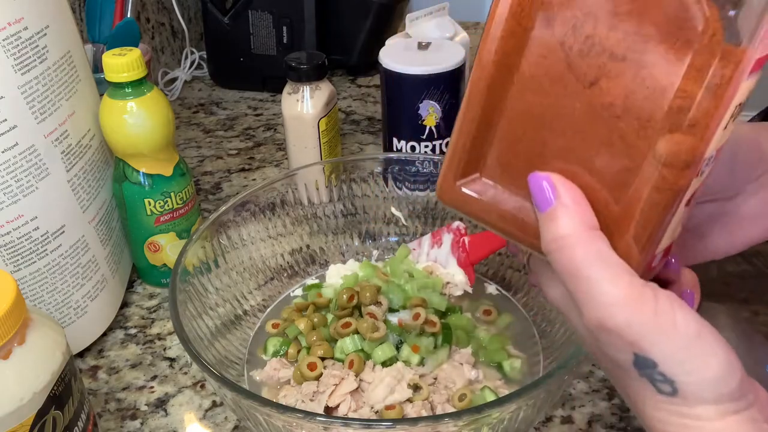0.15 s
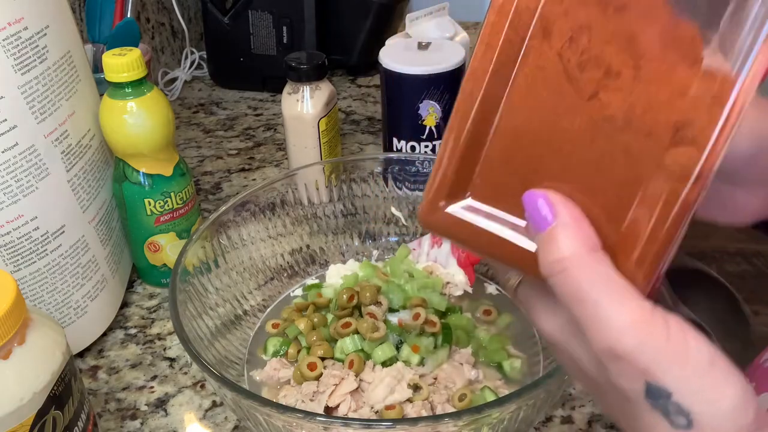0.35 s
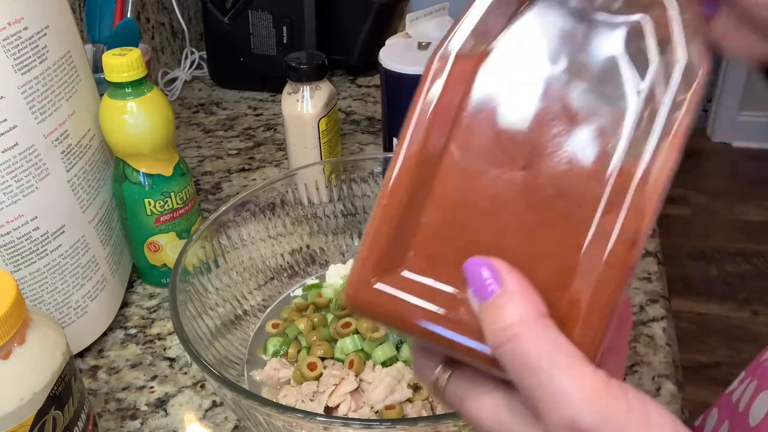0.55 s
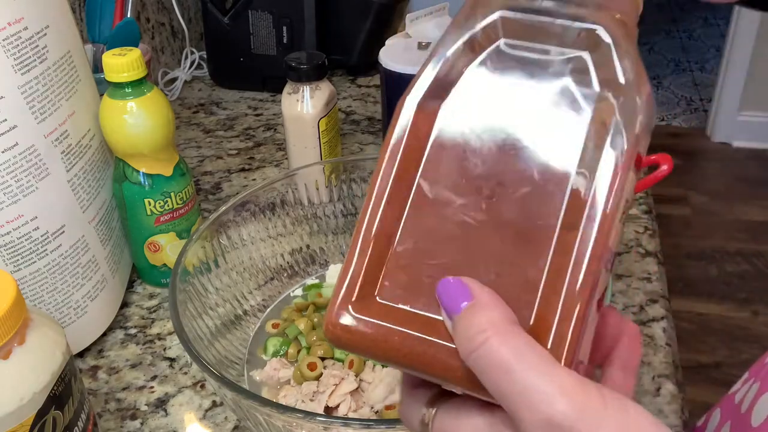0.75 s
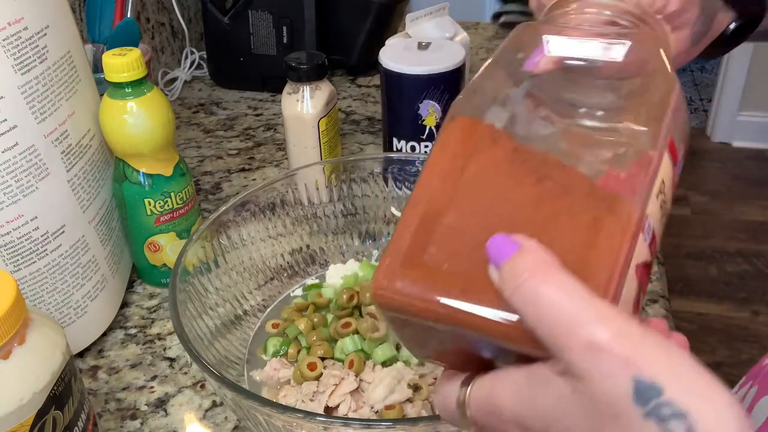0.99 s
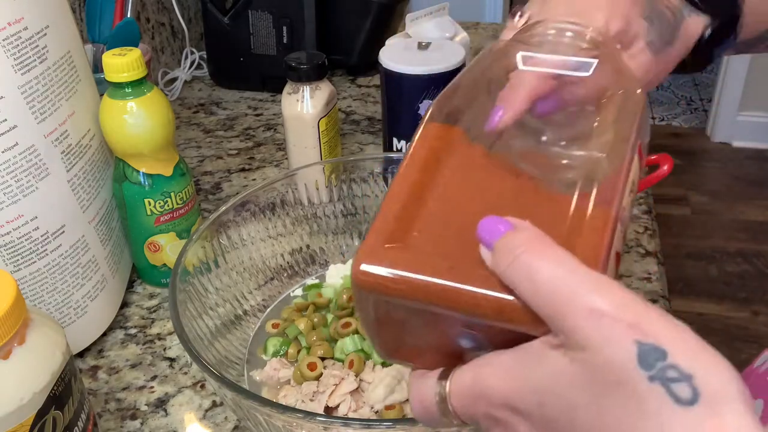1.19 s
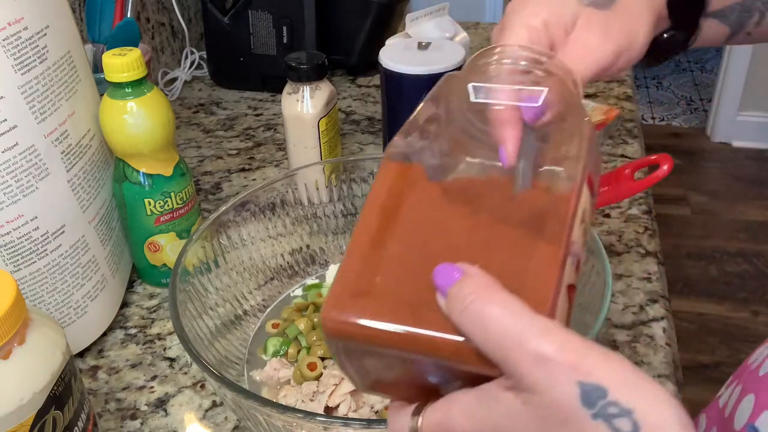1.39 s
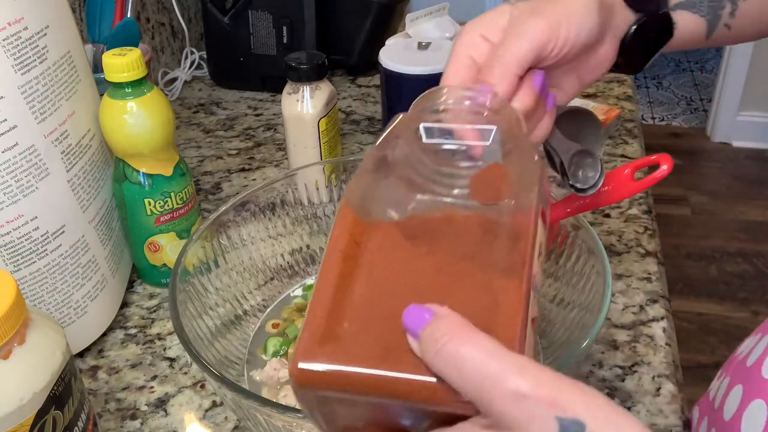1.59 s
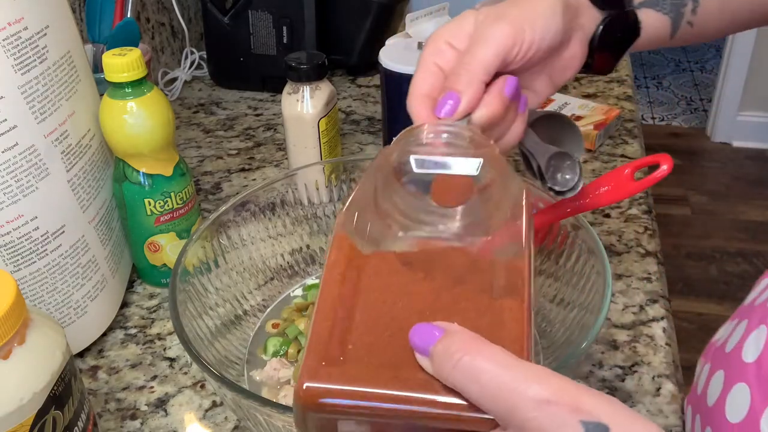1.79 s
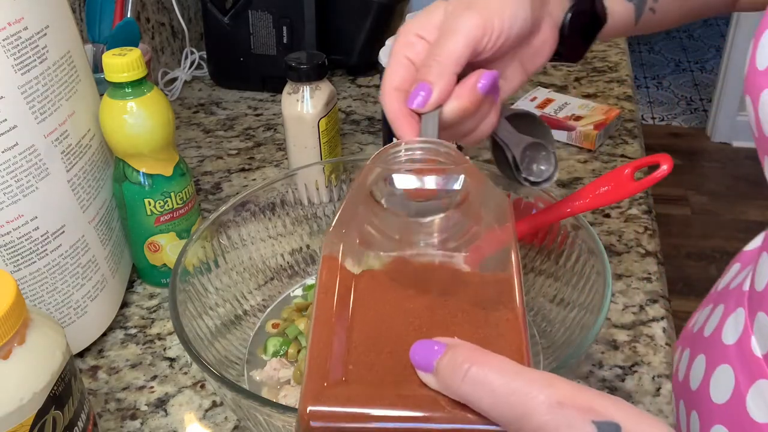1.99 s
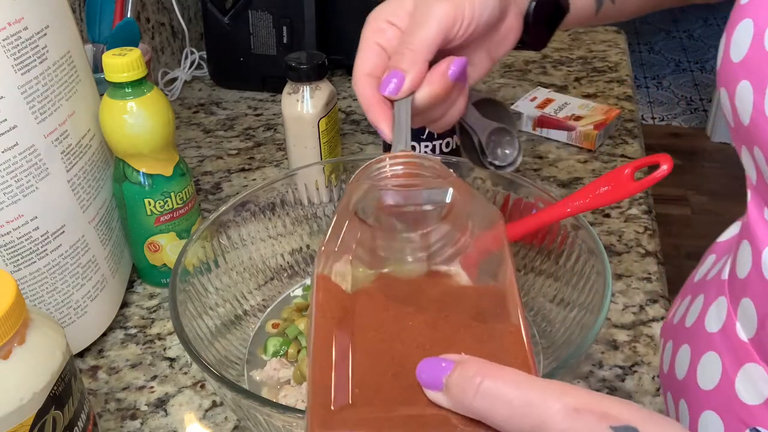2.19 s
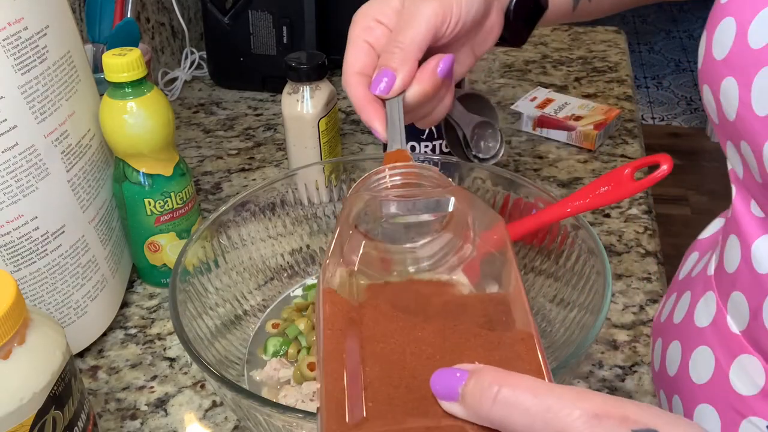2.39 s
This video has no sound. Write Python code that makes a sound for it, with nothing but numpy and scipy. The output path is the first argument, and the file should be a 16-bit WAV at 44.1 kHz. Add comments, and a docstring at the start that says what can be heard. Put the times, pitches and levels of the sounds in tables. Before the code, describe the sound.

Steel measuring spoons jangle brightly, then one scrapes softly through powder in a plastic jar.

```python
"""A bright jangle of steel measuring spoons, picked up close to a stereo microphone pair in a kitchen.
They ring as they strike and sing as they slide over each other. One knocks a hollow note from a
plastic spice jar and scrapes through the powder, which then slides off in three soft swishes.
The left microphone hears it all first; the small room answers, and an appliance hums underneath."""
import sys
import numpy as np
from scipy import signal
from scipy.fft import rfft, irfft
from scipy.io import wavfile
from scipy.ndimage import uniform_filter1d

SR = 44100
rng = np.random.default_rng(int(sys.argv[2]) if len(sys.argv) > 2 else 0)


def bounce(signal):
    """Save signal as a 16-bit WAV file at the path given by the first command-line argument."""
    frames = np.transpose(np.atleast_2d(signal))
    limited = np.clip(frames, -1, 1)
    pcm = np.round(limited * 32767).astype(np.int16)
    wavfile.write(sys.argv[1], SR, pcm)


N = 108045

# spoon on spoon, close up (t/s, level/dB, low-mode weight/dB, chatter decay/s, ring/dB,
# favoured resonance f/Hz, its boost/dB)
CLINKS = [(0.1443, -35, 15, 0.0018, -19, 3970, -10), (0.1991, -25.5, 11.5, 0.0023, -21, 8100, 0.5),
          (0.2127, -22.5, 3, 0.0028, -26, 10300, 1), (0.2155, -31, 9.5, 0.01, -25, 5000, 1),
          (0.237, -15, -10.5, 0.0035, -41, 13400, 8), (0.3172, -6, 2.5, 0.0018, -23.5, 9700, 0),
          (0.3182, -14, 16, 0.0016, -37.5, 3400, -4), (0.3209, -10, -13, .003, -19.5, 14000, 0.5),
          (0.4138, -13.5, -9.5, .0035, -31, 9950, -2), (0.4213, -15.5, -1, 0.0029, -32, 5650, 11),
          (.4622, -24, -1, 0.0016, -37, 14000, -2), (0.4671, -18, -9.5, 0.0035, -48, 14000, -8),
          (0.4816, -26, 5, .003, -41, 12100, -7), (0.4925, -15, -1.5, 0.00071, -30, 11500, 0)]
# damped mode clusters of the nested spoons (f/Hz, width/Hz, level/dB)
NESTED_MODES = [(940, 460, -28.5), (1744, 600, -26), (2450, 610, -16.5), (3440, 800, -13.5),
                (4260, 380, -14), (4930, 300, -9.5), (5500, 2100, -20.5), (6597, 580, -9),
                (8100, 300, -2.5), (8670, 210, -6), (9900, 150, -19), (10040, 510, 1.5),
                (12040, 1500, -16.5), (11850, 1300, -2.5), (13200, 900, -12), (14000, 500, -5),
                (14850, 440, -0.5), (16470, 960, -9.5)]
# long-ringing modes of the steel (f/Hz, level/dB, t60/s)
STEEL_MODES = [(3300, -11, .1), (4075, -13, .12), (4965, -15, .12), (6620, -18, .1), (8043, -4, .14),
               (8591, -9, .18), (9320, -2, .09), (9596, -1, .12), (9756, 2, .13), (11665, -8, .15),
               (12095, -1, .19), (13440, -6, .15), (13900, -4, .09), (14830, -5, .12)]
FAVOURED_WIDTH_HZ, GRIP_DETUNE = 870, .012

def spoon_clinks():
    """Steel strikes, chatters and rings; the point of contact favours one resonance."""
    out, t = np.zeros((2, N)), clock()[:SR // 3]
    lowpass = signal.butter(2, 4500, fs=SR, output="sos")
    lead = 20  # samples of room for the low band to spread ahead of the strike
    for start, db, low_db, decay, ring_db, hz, boost_db in CLINKS:
        contact = amp(-10.5) * rng.standard_normal(len(t)) * np.exp(-t / decay)  # chatter
        contact[0] += amp(1)  # strike
        contact = np.pad(contact, (lead, 0))
        contact += (amp(low_db) - 1) * signal.sosfiltfilt(lowpass, contact, padtype=None)
        contact += amp(boost_db) * resonate(contact, hz, FAVOURED_WIDTH_HZ)
        held_modes = outline(NESTED_MODES) * [1 + GRIP_DETUNE * rng.uniform(-1, 1), 1]
        add(out, amp(db) * colour(contact, held_modes), start - lead / SR)
        steel = ring(STEEL_MODES, scatter_db=2.5, low_db=low_db / 2)
        add(out, amp(db + ring_db) * steel / 2, start)
    return out


# spoon sliding on spoon (t/s, rise/s, fall/s, level/dB, singing resonance f/Hz, its boost/dB)
SLIDES = [(.114, 0.027, 0.026, -47, 11000, -5), (.205, 0.0114, .01, -31, 10300, 9),
          (.238, 0.019, 0.0066, -17.5, 9700, -6), (.283, .012, .006, -35.5, 15000, 7.5),
          (.3095, 0.0031, 0.0025, -17.5, 14800, -2.5), (.455, 0.034, .035, -52, 14000, -6),
          (.645, 0.012, .04, -56, 12100, -4)]
# resonances that the sliding rim excites (f/Hz, width/Hz, level/dB)
RIM_MODES = [(4990, 290, -8), (5800, 340, -11.5), (6650, 1200, -13), (8600, 450, -13.5), (9700, 590, -2),
             (11300, 1800, -11), (12700, 450, -10.5), (13560, 170, 4.5), (14800, 2000, -10.5)]

def spoon_slides():
    """Steel sticks and slips on steel; each slide sings at its own resonance."""
    friction, slide = crunch(per_s=1000), 0
    for start, rise, fall, db, hz, boost_db in SLIDES:
        stroke = friction * strokes([(start, rise, fall, db)])
        slide = slide + stroke + amp(boost_db) * resonate(stroke, hz, FAVOURED_WIDTH_HZ)
    slide = signal.sosfilt(signal.butter(4, 4590, "high", fs=SR, output="sos"), slide)
    steel = unit_energy(ring(STEEL_MODES, scatter_db=1.5))
    return amp(-10) * colour(slide, outline(RIM_MODES)) + amp(-23) * through(slide, steel)


# knocks on the jar (t/s, hollow note level/dB, tick level/dB)
KNOCKS = [(.1663, -39.5, -40), (0.9337, -33.5, -43), (1.0925, -46, -36.5), (1.179, -42, -54),
          (1.249, -54, -36.5), (1.256, -59.5, -44)]
# modes of the plastic jar (f/Hz, level/dB, t60/s)
JAR_MODES = [(760, -5, 0.041), (871, 3, 0.041), (1026, 2, 0.031), (1680, -11, 0.011), (1980, -6.5, 0.017),
             (2170, -6.5, .018), (3400, -12, 0.013)]
# spectrum of the contact tick (f/Hz, level/dB per Hz)
TICK_COLOUR = [(500, -13.5), (1000, -10.5), (1500, -11.5), (2200, 3), (2900, -3), (3500, 1.5), (4400, -7.5),
               (4950, -8.5), (6000, -9.5), (10000, -12.5), (12000, -9), (15500, -23.5)]
JAR_RISE_S, TICK_DECAY_S = .00063, .0047

def jar_knocks():
    """The spoon hits the plastic jar: a tick of contact and a short hollow note."""
    notes, ticks, t = np.zeros((2, N)), np.zeros((1, N)), clock()[:SR // 3]
    onset = 1 - np.exp(-t / JAR_RISE_S)
    for start, note_db, tick_db in KNOCKS:
        add(notes, amp(note_db) * ring(JAR_MODES, scatter_db=1.5) * onset / 2, start)
        tick = rng.standard_normal(len(t)) * onset * np.exp(-t / TICK_DECAY_S)
        add(ticks, amp(tick_db) * tick / 2, start)
    return notes + colour(ticks, TICK_COLOUR)


# taps of a spoon's edge (t/s, level/dB)
TAPS = [(.6347, -29.5), (.689, -48.5), (0.932, -36.5)]
# their spectrum (f/Hz, level/dB per Hz)
TAP_COLOUR = [(1800, -19.5), (3500, -9.5), (6000, -13), (9000, -3), (15000, -7)]

def edge_taps(decay_s=.0013):
    """A spoon's edge makes brief contact: dry ticks with no ring."""
    taps, t = np.zeros((1, N)), clock()[:SR // 3]
    for start, db in TAPS:
        add(taps, amp(db) * rng.standard_normal(len(t)) * np.exp(-t / decay_s) / 2, start)
    return colour(taps, TAP_COLOUR)


# glancing touches on the jar (t/s, f/Hz, width/Hz, decay/s, level/dB)
SCUFFS = [(0.1667, 900, 600, 0.005, -41.5), (0.2374, 1493, 450, 0.0056, -47.5),
          (.246, 2070, 1200, 0.026, -53), (.786, 720, 296, 0.009, -58), (1.692, 2780, 197, 0.0054, -59),
          (1.694, 3260, 161.4, 0.0064, -51), (1.944, 2800, 300, 0.0054, -52.5),
          (1.966, 3400, 397, .008, -57)]

def jar_scuffs():
    """Soft, brief scuffs each wake one resonance of the jar's wall."""
    out, t = np.zeros((1, N)), clock()[:SR // 8]
    onset = 1 - np.exp(-t / JAR_RISE_S)
    for start, hz, width, decay, db in SCUFFS:
        noise = rng.standard_normal(len(t))
        scuff = unit(resonate(resonate(noise, hz, width), hz, width))
        add(out, amp(db) * scuff * onset * np.exp(-t / decay), start)
    return out


# spoon and fingers brushing the jar, then digging in it (t/s, level/dB)
DIG_EFFORT = [(0, -67), (.05, -68.5), (.085, -73), (.8, -77.5), (.86, -73.5), (.92, -64.5), (.98, -63.5),
              (1.012, -70.5), (1.036, -59.5), (1.125, -60.5), (1.18, -57), (1.235, -72), (1.275, -57),
              (1.34, -64.5), (1.42, -64.5), (1.445, -82)]
# spectrum of the digging (f/Hz, level/dB per Hz)
DIG_COLOUR = [(240, -19), (400, -3), (635, -6), (707, -6), (837, -1), (1040, -4), (1230, -9.5),
              (1750, -10.5), (2110, -3.5), (2870, -14), (3550, -12.5), (4270, -18), (4910, -10.5),
              (5900, -20), (7000, -13.5), (8280, -14.5), (9220, -17.5), (15800, -16)]

def digging(damping_s=.008):
    """Gritty friction faintly rings the spoon; buried in powder, it rings only briefly."""
    friction = crunch(per_s=1000) * effort(DIG_EFFORT)
    steel = ring(STEEL_MODES, scatter_db=1.5, low_db=-.5)
    buried = unit_energy(steel * np.exp(-clock()[:SR // 3] / damping_s))
    return colour(friction, DIG_COLOUR) + amp(-10.5) * through(friction, buried)


# the spoon against the jar's wall (t/s, level/dB)
RUB_EFFORT = [(1.66, -90), (1.78, -66), (1.91, -77.5), (1.98, -64), (2.13, -58.5), (2.19, -63.5),
              (2.22, -62.5), (2.32, -64), (2.38, -55.5), (2.45, -57.5)]
# spectrum of the rubbing (f/Hz, level/dB per Hz)
RUB_COLOUR = [(180, -26.5), (300, -3), (541, -10.5), (700, -6), (930, 3), (1300, -6), (1700, -12),
              (2100, -5), (2650, -14), (3220, -14.5), (4470, -31), (4850, -23.5), (15000, -26)]

def wall_rub():
    """Duller friction as the spoon is drawn up the wall."""
    return colour(grains(spread_db=7.5) * effort(RUB_EFFORT), RUB_COLOUR)


# powder sliding (t/s, rise/s, fall/s, level/dB)
SWISHES = [(1.64, 0.083, 0.089, -59), (1.925, 0.033, 0.08, -58), (2.22, 0.043, 0.064, -55.5)]
# its spectrum (f/Hz, level/dB per Hz)
POWDER_COLOUR = [(880, -42.5), (1500, -6.5), (1860, -13.5), (2330, -2), (3690, -1), (6010, -4.5),
                 (7980, -5), (12600, -15), (13700, -21), (15500, -28)]

def powder_swishes():
    """Fine powder slides off the spoon, a soft hiss spread wide across the microphones."""
    hiss = np.array([grains(spread_db=6.5) for _ in range(2)])
    return colour(hiss * strokes(SWISHES), POWDER_COLOUR)


# bites of the rim (t/s, rise/s, fall/s, level/dB)
BITES = [(1.68, .012, 0.013, -56), (1.938, .02, 0.018, -60), (2.254, 0.0092, .028, -53.5)]
# spectrum of the grit (f/Hz, level/dB per Hz)
GRIT_COLOUR = [(2300, -15), (2750, -6), (3000, -20.5), (3300, -3), (4400, -1), (4950, 0), (5600, -2),
               (8000, 0), (12000, -20)]

def grit_bites():
    """Granules crack as the spoon's rim bites into them."""
    return colour(crunch(per_s=350) * strokes(BITES), GRIT_COLOUR)


# shifts of the hand (t/s, rise/s, fall/s, level/dB)
GRIPS = [(.36, 0.081, 0.062, -60.5), (.785, 0.0013, 0.02, -63.5), (.935, 0.011, 0.011, -57),
         (1.82, 0.015, 0.03, -54.5)]
# their spectrum (f/Hz, level/dB per Hz)
GRIP_COLOUR = [(200, -11), (350, -1), (560, -5), (800, -8), (1600, -23), (4000, -22)]

def hand_on_jar():
    """The hand shifts on the jar with a low, muffled rub."""
    return colour(rng.standard_normal(N) * strokes(GRIPS), GRIP_COLOUR)


NEAR_DECAY_S, EARLY_DECAY_S, ROOM_T60_S, RIGHT_MIC_LAG_S = .0018, .01, .52, .00057

def kitchen(x):
    """Hands, jar and cupboards scatter the sound on its way to the microphones; a short tail follows."""
    t = clock()[:SR // 2]
    shape = (2, len(t))
    near = rng.standard_normal(shape) * np.exp(-t / NEAR_DECAY_S)
    echoes = rng.standard_normal(shape) * (rng.random(shape) < .05)
    early = echoes * np.exp(-t / EARLY_DECAY_S) * (t > .002)
    tail = rng.standard_normal(shape) * amp(-60 * t / ROOM_T60_S) * (t > .008)
    near, early, tail = (unit(path) / np.sqrt(len(t)) for path in (near, early, tail))
    near = signal.sosfilt(signal.butter(1, 2450, "high", fs=SR, output="sos"), near)
    tail = signal.sosfilt(signal.butter(1, 11000, fs=SR, output="sos"), tail)
    paths = rfft((t == 0) + amp(.5) * near + amp(-4.5) * early + amp(-8.5) * tail)
    # even out the broad peaks, so the room adds little colour
    power = uniform_filter1d(np.abs(paths) ** 2, size=150, axis=1)
    flatten = minimum_phase(-np.log(power / power.mean()) / 2)
    at_mics = np.array([x[0], np.roll(x[1], int(RIGHT_MIC_LAG_S * SR))])
    return through(at_mics, irfft(paths * flatten))


# background rumble of the kitchen (f/Hz, level/dB per Hz)
RUMBLE_COLOUR = [(25, -6.5), (35, -4), (60, -3.5), (90, -11.5), (150, -8.5), (260, -17), (500, -24),
                 (1000, -30.5), (1600, -50.5), (3000, -50), (7000, -49.5), (15000, -61)]
# its width across the microphones (f/Hz, side minus mid level/dB)
RUMBLE_WIDTH = [(30, -22.5), (80, -13.5), (170, -11), (350, -1.5), (700, -2.5), (8000, 0.5)]
# motor and mains tones (f/Hz, level/dB)
HUM_TONES = [(51, -58.5), (75, -69), (120, -58.5), (149, -72.5), (208, -73), (243, -71.5)]

def appliance():
    """Motor and mains hum over a low rumble, its bass alike at both microphones."""
    mid, side = colour(rng.standard_normal((2, N)), RUMBLE_COLOUR)
    width_hz, width_db = np.array(RUMBLE_WIDTH, float).T
    side_db = np.interp(np.log(np.fft.rfftfreq(N, 1 / SR) + 1), np.log(width_hz), width_db)
    side = irfft(rfft(side) * amp(side_db), N)
    hum = sum(amp(db) * np.sqrt(2) * np.sin(2 * np.pi * (hz * clock() + rng.random()))
              for hz, db in HUM_TONES)
    return amp(-55.5) * np.array([mid + side, mid - side]) + hum


def ring(modes, scatter_db, low_db=0):
    """One blow's decaying modes; their strengths vary with the point of contact and the direction."""
    t = clock()[:SR // 3]
    hz, db, t60 = np.array(modes, float).T
    gain = amp(db - scatter_db * rng.standard_normal((2, len(hz))) + low_db * (hz < 7000))
    phase = rng.uniform(0, 2 * np.pi, len(hz))
    mic_phase = np.minimum(hz / 3000, 2) * rng.standard_normal((2, len(hz)))
    partials = np.exp(np.outer(2j * np.pi * hz - np.log(1000) / t60, t))
    return ((gain * np.exp(1j * (phase + mic_phase))) @ partials).imag


def crunch(per_s, bed_db=-5):
    """Separate tiny cracks over a bed of fine friction, rms 1."""
    cracks = (rng.random(N) < per_s / SR) * rng.uniform(-1.4, 1, N)
    return unit(unit(cracks) + amp(bed_db) * rng.standard_normal(N))


def grains(spread_db):
    """Dense friction clicks of uneven size, rms 1."""
    sizes = amp(spread_db * np.clip(rng.standard_normal(N // 24 + 1), -2, 2))
    return unit(rng.standard_normal(N) * np.repeat(sizes, 24)[:N])


def strokes(rows):
    """Gain of strokes that swell and die away."""
    t, gain = clock(), 0
    for start, rise, fall, db in rows:
        swell = np.clip((t - start) / rise, 0, 1) ** .96
        gain = gain + amp(db) * swell * np.exp(-np.maximum(t - start - rise, 0) / fall)
    return gain


def effort(rows):
    """Gain through (t/s, level/dB) points, silent outside."""
    times, db = np.array(rows).T
    return amp(np.interp(clock(), times, db, left=-120, right=-120))


def resonate(x, hz, width_hz):
    """One damped resonance, gain 1 at its centre."""
    return signal.lfilter(*signal.iirpeak(hz, hz / width_hz, fs=SR), x)


def outline(modes):
    """Spectrum (f/Hz, level/dB) of a set of damped resonances."""
    f = np.geomspace(400, 16000, 500)
    power = sum(amp(db) ** 2 / (1 + ((f - hz) / width * 2) ** 2) ** 2 for hz, width, db in modes)
    return np.column_stack([f, 10 * np.log10(power)])


def colour(x, points, skirt_db_per_octave=18):
    """Causal filter through (f/Hz, level/dB) points; keeps the power of white noise."""
    hz, db = np.array(points, float).T
    octave = np.log2(np.maximum(np.fft.rfftfreq(16384, 1 / SR), 1))
    beyond_ends = np.abs(octave - np.clip(octave, np.log2(hz[0]), np.log2(hz[-1])))
    gain = amp(np.interp(octave, np.log2(hz), db) - skirt_db_per_octave * beyond_ends)
    return through(x, irfft(minimum_phase(np.log(unit(gain) + 1e-7))))


def minimum_phase(log_gain):
    """Spectrum of the causal filter with this log gain."""
    cepstrum = irfft(log_gain)
    half = cepstrum.shape[-1] // 2
    cepstrum[..., 1:half] *= 2
    cepstrum[..., half + 1:] = 0
    return np.exp(rfft(cepstrum))


def through(x, response):
    """Convolve along time."""
    return signal.fftconvolve(np.atleast_2d(x), np.atleast_2d(response), axes=-1)[:, :N]


def add(out, x, start):
    """Mix a short sound in at its time."""
    i = max(int(start * SR), 0)
    out[:, i:i + x.shape[-1]] += x[..., :N - i]


def amp(db):
    """Decibels to gain."""
    return 10 ** (np.asarray(db) / 20)


def unit(x):
    """Scale to rms 1."""
    return x / np.sqrt(np.mean(x ** 2))


def unit_energy(pair):
    """Scale a stereo response to a mean energy of 1 per side."""
    return pair / np.sqrt(np.sum(pair ** 2) / 2)


def clock():
    """Time of each sample."""
    return np.arange(N) / SR


def scene():
    """Spoons, jar and spice close to the microphones, the appliance in the background."""
    contacts = spoon_clinks() + spoon_slides() + jar_knocks() + edge_taps() + jar_scuffs()
    scooping = digging() + wall_rub() + powder_swishes() + grit_bites() + hand_on_jar()
    return kitchen(contacts + scooping) + appliance()


def record(dry, top_hz=15850):
    """The recorder cuts the highest treble steeply."""
    return signal.sosfilt(signal.ellip(10, .2, 80, top_hz, fs=SR, output="sos"), dry)


dry = scene()
out = record(dry)
bounce(out)
```